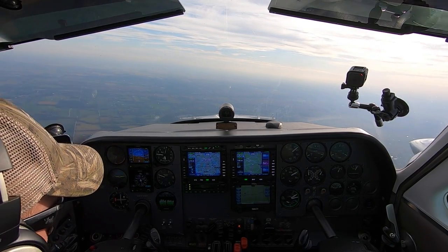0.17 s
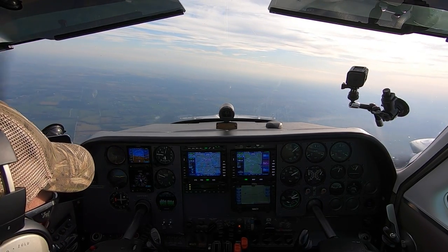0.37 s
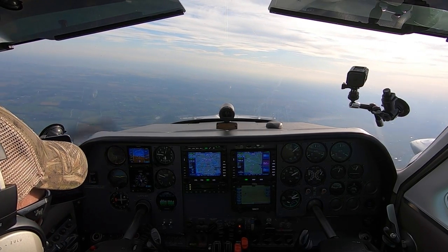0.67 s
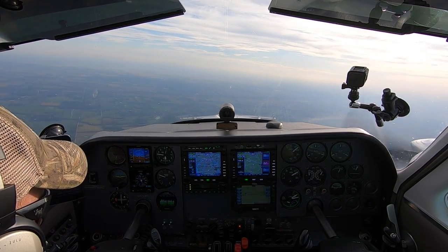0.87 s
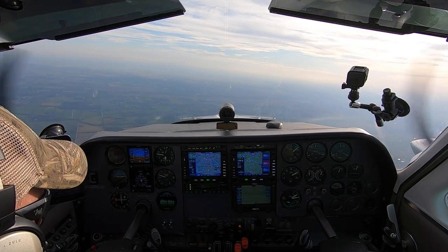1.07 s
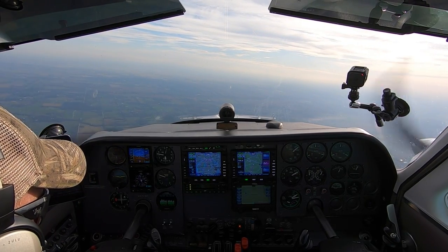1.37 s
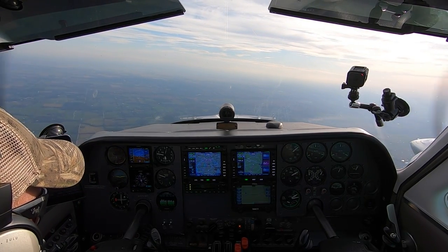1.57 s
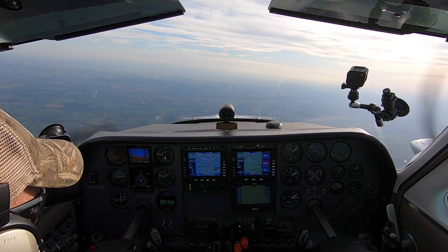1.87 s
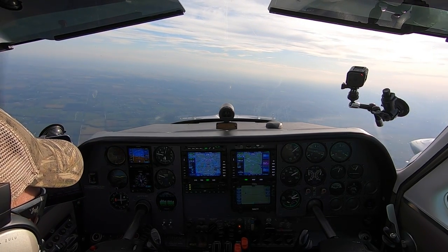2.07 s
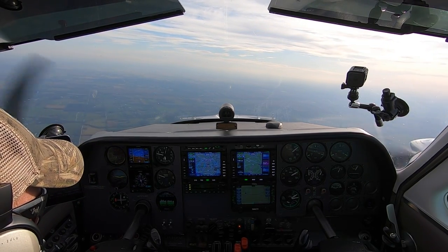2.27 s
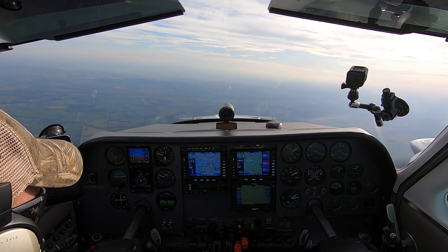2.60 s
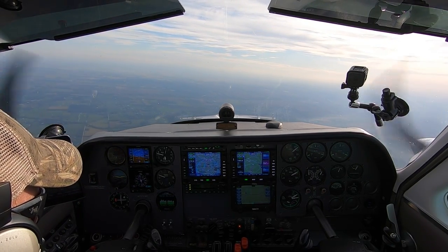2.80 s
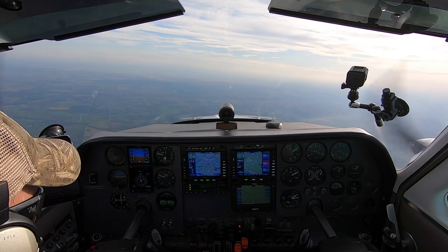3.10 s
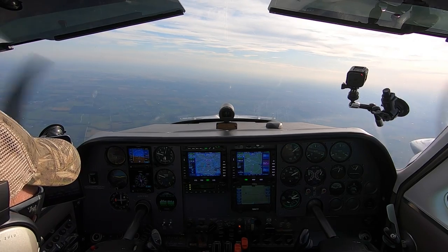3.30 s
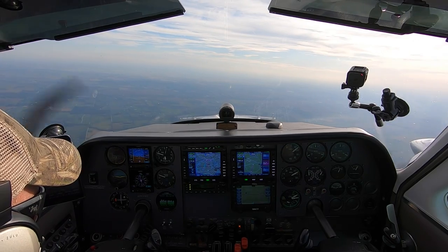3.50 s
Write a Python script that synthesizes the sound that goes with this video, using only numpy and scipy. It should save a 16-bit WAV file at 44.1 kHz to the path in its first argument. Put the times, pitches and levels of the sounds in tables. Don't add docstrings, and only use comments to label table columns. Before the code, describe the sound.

Twin piston propeller engines drone steadily inside a small plane cabin, pulsing gently amid rushing wind noise

```python
import sys
import numpy as np
from scipy import signal
from scipy.fft import rfft, irfft, next_fast_len
from scipy.io import wavfile
from scipy.ndimage import uniform_filter1d, minimum_filter1d

SR = 44100
rng = np.random.default_rng(int(sys.argv[2]) if len(sys.argv) > 2 else 0)


def dump_mix(stems):
    frames = np.atleast_2d(stems).T
    limited = np.clip(frames, -1, 1)
    pcm = np.round(limited * 32767).astype(np.int16)
    wavfile.write(sys.argv[1], SR, pcm)


def gain_from_db(level_db):
    decades = np.asarray(level_db, float) / 20
    return 10 ** decades


N = 160965


def rms_one(x):
    return x / np.sqrt(np.mean(x ** 2) + 1e-20)


def coloured(gain_at):
    size = next_fast_len(N)
    hz = np.maximum(np.arange(size // 2 + 1) * SR / size, 1e-3)
    return rms_one(irfft(rfft(rng.standard_normal(size)) * gain_at(hz), size)[:N])


def drift(rate_hz):
    count = N // 64 + 2
    hz = np.arange(count // 2 + 1) * SR / 64 / count
    slow = irfft(rfft(rng.standard_normal(count)) / (1 + (hz / rate_hz) ** 2), count)
    return np.interp(np.arange(N) / 64, np.arange(count), rms_one(slow))


def air(spectrum, low_hz, high_hz, patchy_db):
    # centre in Hz, width in Hz, peak in dB.
    panels = [(77, 4.9, 9), (407, 47, 6), (677, 13, 4.5), (690, 15, 0), (1077, 160, 3.5), (1310, 14, -9),
              (1520, 14, 4), (1990, 17, 4.5), (2572, 66, 7.5), (3000, 53, 7), (3994, 41, 3.5)]
    spectrum_hz, spectrum_db = np.transpose(spectrum)

    def gain_at(hz):
        db = np.interp(np.log(hz), np.log(spectrum_hz), spectrum_db)
        for centre_hz, width_hz, peak_db in panels:
            db = db + peak_db / (1 + (2 * (hz - centre_hz) / width_hz) ** 2)
        return gain_from_db(db) / (1 + (low_hz / hz) ** 12) / (1 + (hz / high_hz) ** 20)

    noise = coloured(gain_at)
    size = next_fast_len(N)
    parts = rfft(noise, size)
    half_octave = 2 * np.log2(np.arange(1, size // 2 + 2) * SR / size / low_hz)
    out = 0
    for k in range(-1, int(2 * np.log2(high_hz / low_hz)) + 3):
        band = irfft(parts * np.clip(1 - abs(half_octave - k), 0, 1), size)[:N]
        out = out + band * gain_from_db(patchy_db * drift(13))
    return rms_one(out)


def airflow():
    # time in seconds, level in dB.
    level_points = [(0.05, -36.5), (0.06, -35.5), (0.31, -39), (1.18, -37.5), (1.51, -35), (2.21, -38),
                    (2.4, -38.5), (2.62, -39.5), (3.55, -36.5), (3.6, -36)]
    # frequency in Hz, density in dB per Hz.
    rumble_spectrum = [(20, -9), (30, -4), (45, -2.5), (90, -1.5), (150, -6), (260, -4.5), (330, -11),
                       (450, -11)]
    roar_spectrum = [(500, 2), (680, -2), (800, -5), (1090, -7.5), (1760, -8), (2280, -15), (3030, -15.5),
                     (4210, -19)]
    hiss_spectrum = [(4300, 0.5), (5000, -4), (6300, -4.5), (7000, -10), (8500, -15.5), (10000, -19),
                     (12500, -23), (15700, -23.5)]
    rumble_top_hz, crossover_hz = 492, 4340
    rumble_db, hiss_db = -31.5, -22.5

    level_db = np.interp(np.arange(N) / SR, *np.transpose(level_points))
    roar = air(roar_spectrum, rumble_top_hz, crossover_hz, patchy_db=.5)
    hiss = gain_from_db(hiss_db) * air(hiss_spectrum, crossover_hz, 16000, patchy_db=.5)
    rumble = gain_from_db(rumble_db - level_db.mean()) * air(rumble_spectrum, 15, rumble_top_hz, patchy_db=-.5)
    return gain_from_db(level_db) * (roar + hiss + rumble)


def alternators():
    # frequency in Hz, level in dB, wobble as a share of frequency.
    whine = [(5794, -80, .005), (8691, -81.5, .005), (11588, -81, .005), (14485, -81, .005),
             (9480, -90, .0025), (12640, -85.5, .003), (10460, -86.5, 0)]
    from_s, fade_s = 2.6, .9
    wobble_hz, wobble_width_hz = 30, 8

    t = np.arange(N) / SR
    wobble = coloured(lambda hz: 1 / (1 + ((hz - wobble_hz) / wobble_width_hz) ** 2))
    tones = 0
    for hz, db, share in whine:
        turns = hz * np.cumsum(1 + share * wobble) / SR
        tones = tones + gain_from_db(db + 9) * np.cos(2 * np.pi * turns)
    return tones * np.clip((t - from_s) / fade_s, 0, 1.2)


def engines():
    # order, left engine level in dB,
    # right engine level in dB, moment both are in step in seconds.
    orders = [(1, -54, -50, 9.1), (2, -44, -55, 5.9), (3, -33.3, -33.1, 1.69), (4, -36, -52, 1.86),
              (5, -48, -53, 1.2), (6, -18.6, -33, .45), (7, -40, -47, 1.0), (8, -43, -42, 1.35),
              (9, -29.5, -26.8, .41), (10, -49, -52, .23), (11, -50, -52, .43), (12, -30.5, -34, .96),
              (14, -51, -49, .1), (15, -43.5, -44.5, .01), (18, -41, -49, .41), (20, -53, -53, .07),
              (21, -47, -50, .51), (22, -49, -56, .27), (24, -42, -45, .24), (27, -51, -63, .11),
              (30, -53, -60, .06), (32, -55, -67, .11), (33, -57, -69, .15), (36, -57, -66, .28),
              (38, -56, -76, .11)]
    # order,
    # first start in seconds, hold in seconds, level in dB, lag in turns.
    handover = [
        (3, 3.26, .26, -26, -.46),
        (6, 1.18, .31, -19.5, .18),
        (9, .39, .26, -29.5, .38),
        (9, .66, .35, -40, .57),
    ]
    cycle_hz, speedup_hz_per_s, mid_s = 19.387, .029, 1.8
    right_slower_hz = .081
    handover_fade_s = .05
    flutter_db, flutter_hz, phase_sway_turns = .4, 4, .006

    t = np.arange(N) / SR
    cycles = cycle_hz * t + speedup_hz_per_s / 2 * (t - mid_s) ** 2
    out = 0
    for order, left_db, right_db, step_s in orders:
        beat_hz = order * right_slower_hz
        left = order * cycles + rng.random() + phase_sway_turns * drift(flutter_hz)
        right = left - beat_hz * (t - step_s)
        tone = gain_from_db(left_db) * np.cos(2 * np.pi * left) + gain_from_db(right_db) * np.cos(2 * np.pi * right)
        for handed_order, first_s, held_s, db, lag_turns in handover:
            if handed_order != order:
                continue
            held = (t - first_s) % (1 / beat_hz) < held_s
            share = uniform_filter1d(held * 1., int(handover_fade_s * SR))
            other_port = gain_from_db(db) * np.cos(2 * np.pi * (left + lag_turns))
            tone = (1 - share) * tone + share * other_port
        out = out + tone * gain_from_db(flutter_db * drift(flutter_hz))
    return out


def scene():
    return (airflow() + alternators() + engines())[None]


def low_pass(x):
    return signal.sosfilt(signal.butter(12, 15740, fs=SR, output="sos"), x)


def record(dry):
    limit, hold_s = .255, .012
    span = int(hold_s * SR)
    gain = minimum_filter1d(np.minimum(1, limit / (abs(dry) + 1e-9)), span)
    return low_pass(dry * uniform_filter1d(gain, span))


dry = scene()
out = record(dry)
dump_mix(out)
```